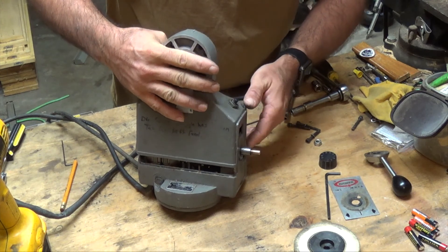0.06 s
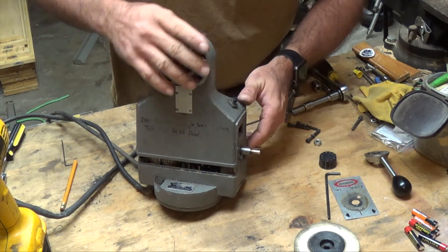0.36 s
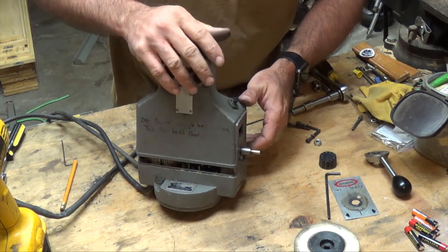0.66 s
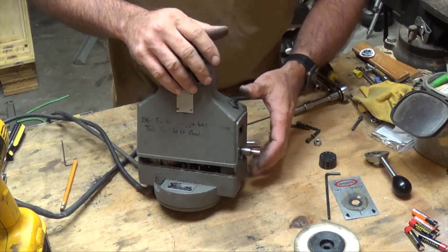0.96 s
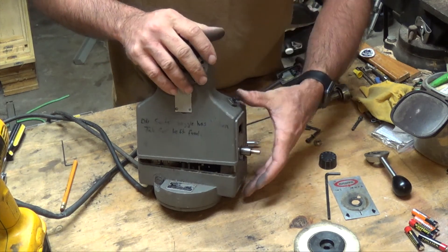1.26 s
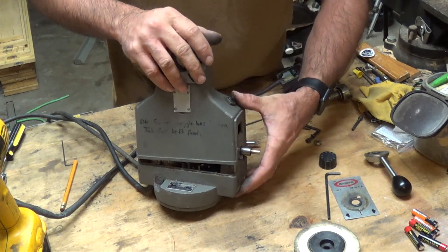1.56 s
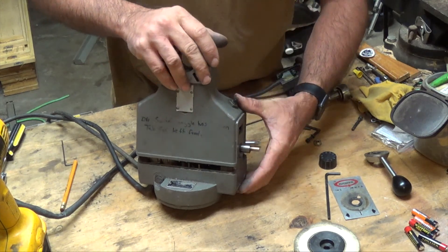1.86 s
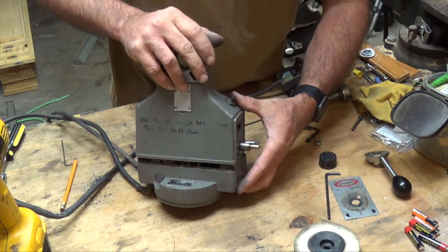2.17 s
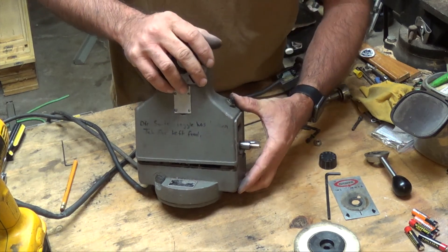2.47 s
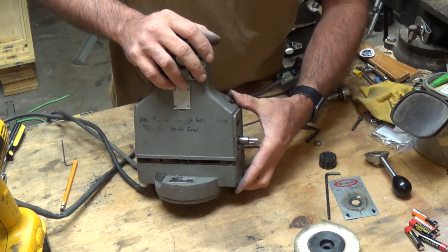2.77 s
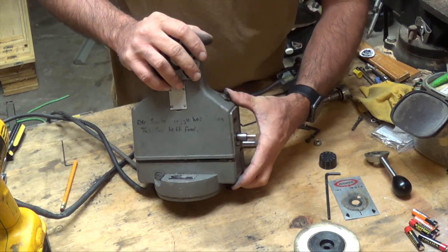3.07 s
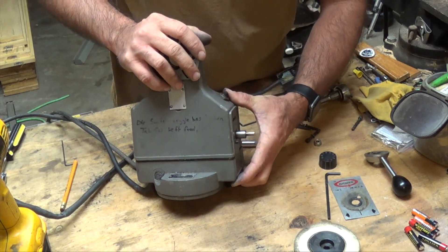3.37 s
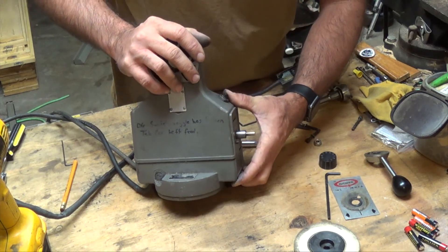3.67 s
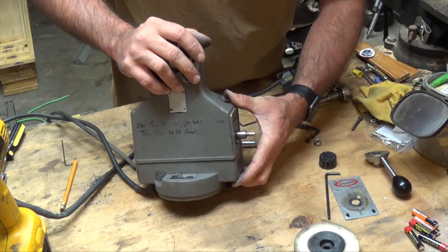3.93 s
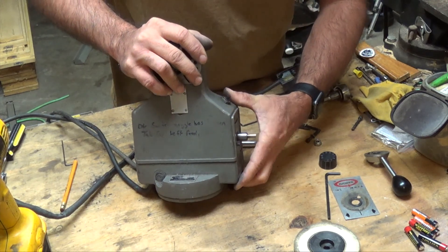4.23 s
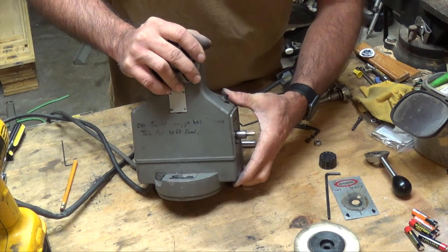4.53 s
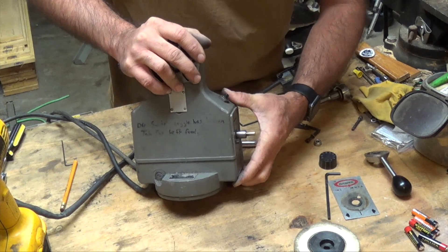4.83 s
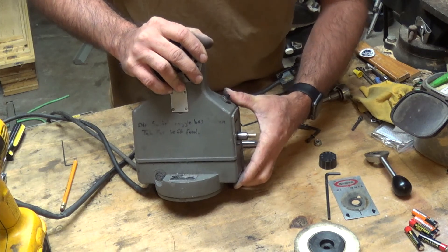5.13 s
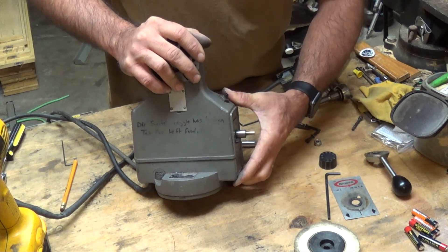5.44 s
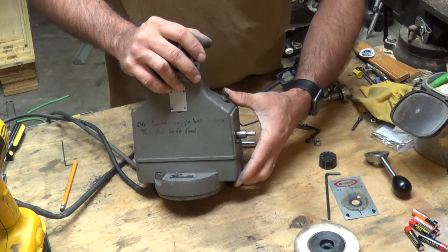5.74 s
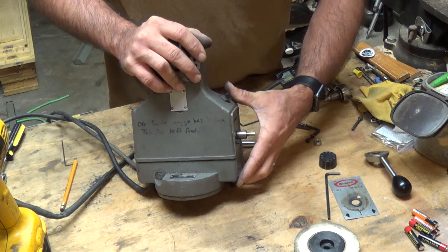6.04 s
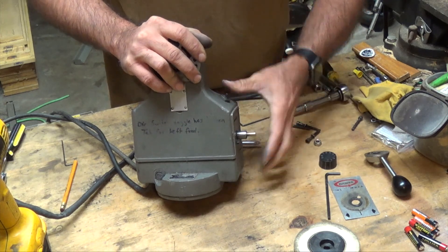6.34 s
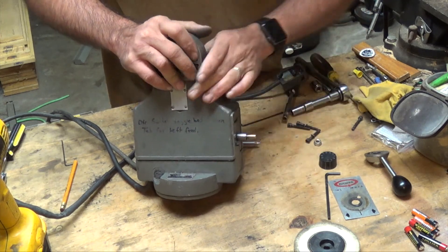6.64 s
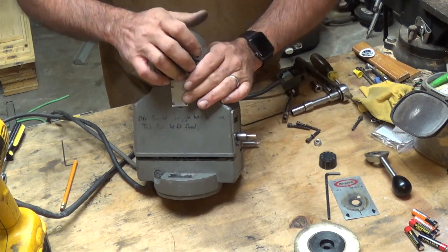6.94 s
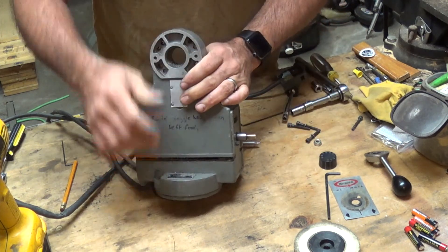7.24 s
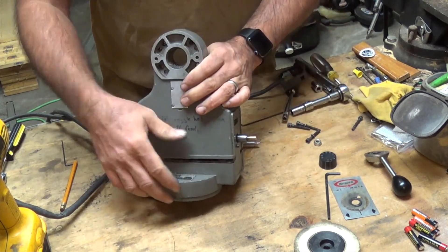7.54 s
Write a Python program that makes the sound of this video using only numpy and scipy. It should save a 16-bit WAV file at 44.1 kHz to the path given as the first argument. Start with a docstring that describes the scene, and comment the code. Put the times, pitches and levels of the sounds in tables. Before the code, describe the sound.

A faint hiss, electrical hum and thin ticking whine run throughout in a small workshop, with everything heard up close. A hand brushes lightly over painted metal at the start. At about 1 second, a loose cast metal cover hits a machine housing in a quick cluster of bright, ringing clanks. Lighter taps, a tick and soft bumps follow until about 2.3 seconds. At 2.9 seconds the cover clinks and its rim slides down with a brief, thin rasp, seating with a loud, sharp knock near 3.5 seconds. The housing then rocks on the wooden bench with soft, low thumps, and a firmer double knock lands at 5.3 seconds. Another soft thump comes near 5.9 seconds. Skin rubs faintly around 6.6 seconds, leading into a loud clank and knock at 6.9 seconds and one small, dull knock just after.

```python
"""Fitting a metal cover

A cast metal cover is worked down onto a machine housing that stands on a wooden workbench.
Loose, the cover clanks and rings; pressed home, it knocks dully and rocks the housing on the bench.
In between, hands rub the paint, the cover's rim slides and sharp edges catch with a tick.
A faint hiss and hum fill the small workshop, and a camera nearby ticks and whines."""
import sys
import numpy as np
from scipy import signal
from scipy.fft import rfft, irfft, next_fast_len
from scipy.io import wavfile
from scipy.ndimage import map_coordinates

SR = 44100
rng = np.random.default_rng(int(sys.argv[2]) if len(sys.argv) > 2 else 0)


def int16_out(signal):
    """Quantize to a 16-bit WAV file."""
    q = np.round(np.clip(np.atleast_2d(signal).T, -1, 1) * 32767)
    wavfile.write(sys.argv[1], SR, q.astype(np.int16))


N = 335160

# The workshop's echo. Each row: frequency in Hz, fade time in seconds (the time to drop by 60 dB).
ROOM_FADE = [(100, 0.23), (250, 0.32), (1000, 0.28), (4000, 0.28), (8000, 0.24), (15000, 0.064)]
# The tone of the background hiss. Each row: frequency in Hz, strength in dB.
HISS_TONE = [(15, -42), (25, -3.5), (113, -0.5), (136, 0), (215, -1), (240, -3), (331, -5), (359, -2.5),
             (389, -6), (482, -5.5), (523, -5), (2120, -10), (3630, -13.5), (13500, -17), (15500, -17.5)]
# How wide the hiss sounds. Each row: frequency in Hz, the ears' opposite part over their shared part in dB.
HISS_WIDTH = [(60, -50), (150, -19), (380, -4), (950, -1.5), (2380, -2.5), (5980, -8), (15000, -93)]
# The level of the background hiss, which dips after the first loud clanks and slowly recovers.
# Each row: time in seconds, level in dB.
HISS_LEVEL = [(0.0, -51), (1.2, -50), (1.33, -53), (3.26, -49.5), (6.54, -49), (6.88, -46), (7.6, -49.5)]
# Mains hum and thin electrical whines. Each row: pitch in Hz, level in dB.
HUM_NOTES = [(120, -68), (240, -67.5), (360, -64.5), (480, -68), (1920, -72), (2040, -71), (2159, -71),
             (2520, -75.5), (7881, -73)]
# A hand slides over the paint. Each row: start in seconds, length in seconds, level in dB.
HAND_RUBS = [(0.116, 0.088, -59), (0.24, 0.027, -49.5), (6.56, 0.32, -55.5)]
# The tone of rubbing skin. Each row: frequency in Hz, strength in dB.
SKIN_TONE = [(500, -33), (3000, -14), (5000, -7), (11000, -0.5), (15000, -19)]
# Sharp edges catch. Each row: start in seconds, level in dB, frequency in Hz below which the tick thins.
EDGE_TICKS = [(.9465, -43, 2800), (1.846, -36, 6000), (3.438, -26, 8000), (5.3612, -33.5, 6000)]
# The tone of a hard edge's click. Each row: frequency in Hz, strength in dB.
CLICK_TONE = [(300, -30), (2000, 12), (5000, 7), (8000, 1), (12000, -2.5), (15500, -31)]
# The notes of the loose cover. Each row: pitch in Hz, level in dB when struck on the side,
# on the rim and on a corner, fade time in seconds.
COVER_NOTES = [(809, -17, -16, -18, .2), (879, -2, 0, -4, .24), (1340, -11, -26, -24, .22),
               (1729, -7, -5, -8, .26), (1841, -22, -24, -15, .2), (1934, -19, -17, -14, .2),
               (2567, -16, -6, -10, .18), (2804, -15, -20, -8, .14), (3235, -30, -14, -18, .11),
               (3330, -27, -17, -10, .14), (3531, -24, -13, -11, .11), (3711, -14, -22, -1, .11),
               (4420, -25, -40, -34, .08), (5600, -30, -28, -10, .17), (5770, -26, -28, -14, .14),
               (5990, -17, -25, -18, .12), (6708, -27, -25, -19, .13), (7768, -22, -19, -22, .11),
               (9787, -24, -11, -15, .1), (11090, -24, -22, -7, .1)]
# The notes of the housing with the cover on it. Each row: pitch in Hz, level in dB, fade time in seconds.
HOUSING_NOTES = [(375, -1, 0.1), (420, 4.5, 0.072), (498, 6, 0.056), (601.4, 1.5, 0.092), (783, -1, 0.057),
                 (902, -1.5, 0.051), (988.4, -2, 0.062), (1227, -10, 0.071), (1325, 2, 0.062),
                 (1468, -13.5, 0.24), (1958, -7, 0.047), (1984, -4, 0.091), (2176, -3.5, 0.06),
                 (2370, -35, 0.035), (2824, -12, 0.2), (3685, 5, 0.033), (3870, -10, .14)]
# The casting's crowded notes blur into a clatter. Each row: frequency in Hz, strength in dB.
CLATTER_TONE = [(30, -48), (100, 8.5), (350, -4), (1000, -0.5), (2000, -0.5), (4400, -2.5), (5500, -27),
                (9000, -41), (16000, -22)]
# The notes of the wooden bench top. Each row: pitch in Hz, level in dB, fade time in seconds.
BENCH_NOTES = [(75, -20.5, 0.066), (133.4, -6.5, 0.061), (230, -6, 0.13), (239.2, -5.5, 0.084),
               (350, -8.5, 0.049)]
# The loose cover hits the housing. Each row: start in seconds, cover ring in dB, housing knock in dB,
# bench thump in dB, hardness in Hz (higher is brighter), seconds the cover stays free,
# place struck (-1 side, 0 rim, 1 corner).
LOOSE_CLANKS = [(0.9935, -5.5, -23, -48, 5250, 0.021, 0.095), (1.018, -13, -25.5, -26, 5800, 0.017, 1),
                (1.0473, -11.5, -27, -31, 1150, 0.0085, -0.56), (1.255, -31, -38, -42, 2360, 0.044, -1.1),
                (1.502, -33.5, -40.5, -41, 3330, 0.029, -1.05),
                (1.9081, -27.5, -35.5, -35, 2400, 0.0071, 0.58),
                (2.9195, -17.5, -25.5, -30, 1170, 0.0035, -0.45),
                (3.4291, -16, -18.5, -17, 1790, 0.016, -0.087), (6.8227, -38, -35, -50, 1100, .012, -.8),
                (6.8498, -10, -26.5, -16, 5130, 0.025, -0.95),
                (6.8767, -13.5, -17.5, -13, 3380, 0.0075, -1.1)]
# The pressed cover hits the housing. Each row: start in seconds, housing knock in dB, bench thump in dB,
# hardness in Hz, pitch in Hz of the hollow sound near the blow.
PRESSED_KNOCKS = [(1.0341, -33, -26, 1200, 600), (1.538, -42.5, -40, 900, 447),
                  (2.26, -51, -36, 1700, 1630), (3.118, -32, -31.5, 1500, 790),
                  (3.454, -13.5, -12.5, 2200, 970), (3.4569, -18, -45, 3270, 3870),
                  (3.476, -22, -26, 1300, 357), (5.2684, -26.5, -21.5, 2100, 1410),
                  (5.312, -23.5, -10.5, 3300, 2160), (6.8869, -16, -15.5, 3060, 960),
                  (6.92, -28, -27, 1190, 585), (7.0376, -27, -34.5, 680, 730)]
# Soft low thumps through the bench: mostly the housing rocking, but at 1.834 s the sliding rim starts to
# shudder. Each row: start in seconds, thump in dB, push length in seconds.
HOUSING_ROCKS = [(1.599, -38.5, .003), (1.834, -32, .006), (2.293, -38, 0.0017), (3.214, -33, .003),
                 (3.335, -37.5, .006), (3.752, -30.5, 0.015), (4.443, -32, 0.0065), (4.476, -35, 0.0017),
                 (4.678, -28, 0.0098), (4.898, -29, 0.018), (4.999, -26, 0.0089), (5.121, -30.5, 0.00081),
                 (5.153, -35, .0055), (5.922, -27, 0.01)]
# The rim slides down the housing. Each row: start in seconds, length in seconds, hiss in dB, shudder in dB.
RIM_SLIDES = [(1.841, 0.011, -46, -38.5), (2.885, 0.38, -50, -54)]
# The tone of the sliding rim. Each row: frequency in Hz, strength in dB.
SLIDE_TONE = [(2000, -15), (7500, -8.5), (9800, -5), (11200, -1), (12800, -9), (15500, -10)]
# The rim's narrow, high notes, which make its hiss rasp. Each entry: pitch in Hz.
RIM_NOTES = [9750, 10700, 11300, 11750, 12700]
# The balance between the ears. Each row: frequency in Hz, left minus right in dB.
EAR_BALANCE = [(30, -1.3), (150, -2.2), (600, -1.1), (1300, .8), (2500, 0)]

TIME = np.arange(N) / SR  # seconds through the whole scene
BLOW_TIME = np.arange(SR // 2) / SR  # seconds through one blow


def amp(db):
    """Turns decibels into a number to multiply by."""
    return 10 ** (np.asarray(db) / 20)


def unit(x):
    """Scales a sound to an average (rms) level of 1."""
    return x / np.sqrt(np.mean(x ** 2) + 1e-20)


def along(points, hz):
    """Reads between the rows of a frequency table, spacing octaves evenly."""
    freqs, values = np.transpose(points)
    return np.interp(np.log(hz + 1), np.log(freqs + 1), values)


def wobble(rate):
    """A smooth curve through `rate` random values a second."""
    values = rng.standard_normal(int(N * rate / SR) + 4)
    return map_coordinates(values, [TIME * rate])


def filtered(x, response):
    """Multiplies each frequency in a sound by response(hz)."""
    length = x.shape[-1]
    padded = next_fast_len(length + 8192)
    hz = np.fft.rfftfreq(padded, 1 / SR)
    return irfft(rfft(x, padded) * response(hz), padded)[..., :length]


def noise(tone, size):
    """Noise shaped by a tone table, at an average level of 1."""
    return unit(filtered(rng.standard_normal(size), lambda hz: amp(along(tone, hz))))


def fade(t, fade_s):
    """Dies away, dropping 60 dB every fade_s seconds."""
    return np.exp(-np.log(1000) * t / fade_s)


def stroke(start_s, length_s, attack_s, release_s, sag_db_per_s=0):
    """A loudness curve that swells up to its start, holds or sags for its length, then dies away."""
    t = TIME - start_s
    edges = np.exp(np.minimum(t, 0) / attack_s - np.maximum(t - length_s, 0) / release_s)
    return edges * amp(-sag_db_per_s * np.clip(t, 0, length_s))


def ring(notes, scatter_db):
    """Struck metal rings with fading notes, at slightly new strengths for each blow."""
    hz, db, fade_s = np.transpose(notes)[:, :, None]
    gain = amp(db + scatter_db * rng.standard_normal(hz.shape)) * rng.choice([-1, 1], hz.shape)
    return np.sum(gain * np.sin(2 * np.pi * hz * BLOW_TIME) * fade(BLOW_TIME, fade_s), axis=0)


def soften(x, hz):
    """Turns down the treble above hz, as a softer, longer contact does."""
    return signal.lfilter(*signal.butter(2, hz, fs=SR), x)


def thin(x, hz=85):
    """Turns down everything below hz: small objects give off almost no deep bass."""
    return signal.lfilter(*signal.butter(2, hz, "high", fs=SR), x)


def add(track, start_s, sound):
    """Mixes a sound into a left and right track at the given time."""
    part = track[:, round(start_s * SR):][:, :sound.shape[1]]
    part += sound[:, :part.shape[1]]


def in_room(x, echo_db):
    """Puts a sound in the middle and adds the workshop's short echo, giving left and right."""
    hz, t, spectrum = signal.stft(rng.standard_normal((2, SR // 2)), SR, nperseg=256)
    tail = signal.istft(spectrum * fade(t, along(ROOM_FADE, hz)[:, None]), SR, nperseg=256)[1]
    echo = amp(echo_db) * tail / np.linalg.norm(tail[0])
    late = np.pad(x, (round(.004 * SR), 0))  # the echo starts 4 ms later
    middle, side = signal.fftconvolve(late[None], echo, axes=1)[:, :len(x)]
    side = amp(-5) * soften(side, hz=4500)
    return np.array([x + middle + side, x + middle - side])


def hiss_and_hum():
    """A background hiss dips and recovers, the mains hum, and a low drone swells once near the end."""
    hiss = noise(HISS_TONE, N) * amp(0.099 * wobble(4.6))
    side = filtered(noise(HISS_TONE, N), lambda hz: amp(along(HISS_WIDTH, hz)))
    hiss_db = np.interp(TIME, *np.transpose(HISS_LEVEL))
    hum = sum(amp(db) * np.sqrt(2) * np.sin(2 * np.pi * hz * TIME + 0.076 * wobble(4.02))
              for hz, db in HUM_NOTES)
    swell = stroke(start_s=6.32, length_s=.4, attack_s=0.29, release_s=0.63)
    drone = amp(-55.5) * swell * np.sqrt(2) * np.sin(2 * np.pi * 80 * TIME + wobble(21))
    return amp(hiss_db) * np.array([hiss + side, hiss - side]) + hum + drone


def camera(frame_hz=29.97):
    """The camera's mechanism ticks faintly once a frame, and its high whine flutters twice a frame."""
    since_frame = (TIME + 0.016) % (1 / frame_hz)
    swell = np.exp(-((since_frame - .008) / 0.0035) ** 2)
    ticks = amp(-54.5 + wobble(28)) * swell * np.sin(2 * np.pi * 3270 * since_frame)
    flutter = 1 + 0.26 * np.sin(2 * np.pi * 2 * frame_hz * TIME)
    whine = amp(-57) * flutter * np.sin(2 * np.pi * 525 * frame_hz * TIME)
    return ticks + whine


def hand_rubbing():
    """Skin hisses unevenly as it slides over the paint."""
    level = sum(amp(db) * stroke(start_s, length_s, attack_s=0.017, release_s=0.026)
                for start_s, length_s, db in HAND_RUBS)
    skin = level * amp(1.8 * wobble(70)) * noise(SKIN_TONE, N)
    return in_room(skin, echo_db=-13)


def edge_click():
    """A hard edge makes a short, bright burst of noise."""
    level = fade(BLOW_TIME, 0.034) + amp(-4) * fade(BLOW_TIME, 0.022)
    return noise(CLICK_TONE, len(BLOW_TIME)) * level


def edge_ticking():
    """An edge catches and lets go without moving the housing; the finer the edge, the thinner its tick."""
    out = np.zeros((2, N))
    for start_s, db, low_hz in EDGE_TICKS:
        tick = amp(db) * thin(edge_click(), low_hz)
        add(out, start_s, in_room(tick, echo_db=-7))
    return out


def cover_ring(free_s, place):
    """The place of the blow sets how strong each note is; the ring is choked when the cover lands again."""
    notes = [(hz, np.interp(place, [-1, 0, 1], [side, rim, corner]), fade_s)
             for hz, side, rim, corner, fade_s in COVER_NOTES]
    rise = 1 - np.exp(-BLOW_TIME / .0012)
    choke = fade(np.maximum(BLOW_TIME - free_s, 0), 0.014)
    return ring(notes, scatter_db=1) * rise * choke


def housing_knock(hollow_hz):
    """Short notes sound under a sharp crack and a clatter; the metal near the blow adds a hollow tone."""
    body = amp(-8.5) * ring(HOUSING_NOTES, scatter_db=1.5)
    crack_and_clatter = amp(2) * fade(BLOW_TIME, 0.015) + amp(-4.5) * fade(BLOW_TIME, 0.089)
    knock = body + noise(CLATTER_TONE, len(BLOW_TIME)) * crack_and_clatter
    hollow = signal.lfilter(*signal.iirpeak(hollow_hz, Q=3.5, fs=SR), knock)
    return knock + amp(7) * hollow


def bench_thump(push_s):
    """The bench top's low notes, all pushed the same way, swell over the length of the push."""
    wood = sum(amp(db) * np.sin(2 * np.pi * hz * BLOW_TIME) * fade(BLOW_TIME, fade_s)
               for hz, db, fade_s in BENCH_NOTES)
    return wood * (1 - np.exp(-(BLOW_TIME / push_s) ** 2))


def blow(ring_db, knock_db, thump_db, hard_hz, free_s, place, hollow_hz):
    """One blow rings the cover, knocks the housing, thumps the bench and clicks at the edge."""
    metal = amp(ring_db) * cover_ring(free_s, place) + amp(knock_db) * housing_knock(hollow_hz)
    bench = amp(thump_db) * bench_thump(push_s=0.0018)
    click_db = knock_db - 10.5 + 17 * np.log2(hard_hz / 3000)  # harder blows click more
    click = amp(click_db) * edge_click()
    return in_room(thin(soften(metal, hard_hz) + bench + click), echo_db=-10)


def loose_clanking():
    """The loose cover strikes the housing and rings freely until it lands again."""
    out = np.zeros((2, N))
    for start_s, *settings in LOOSE_CLANKS:
        add(out, start_s, blow(*settings, hollow_hz=710))
    return out


def pressed_knocking(tips_above_db=-17, bounce_loss_db=11):
    """The held cover knocks dully; a heavy knock tips the housing, which settles in two weaker bounces."""
    out = np.zeros((2, N))
    for start_s, knock_db, thump_db, hard_hz, hollow_hz in PRESSED_KNOCKS:
        bounces = 2 if knock_db > tips_above_db else 0
        for k in range(1 + bounces):
            ring_db = knock_db - 16  # a held cover rings little
            sound = blow(ring_db, knock_db, thump_db, hard_hz, free_s=.005, place=.2, hollow_hz=hollow_hz)
            add(out, start_s, sound)
            start_s += .02 * .85 ** k  # each hop is shorter than the last
            knock_db -= bounce_loss_db
            thump_db -= bounce_loss_db
            hard_hz, hollow_hz = 1800, 1990  # the tone of the housing falling back
    return out


def housing_rocking():
    """Soft low thumps through the bench, mostly from hand pressure tipping the housing, once as the rim starts
    to shudder."""
    out = np.zeros((2, N))
    for start_s, db, push_s in HOUSING_ROCKS:
        thump = thin(amp(db) * bench_thump(push_s))
        add(out, start_s, in_room(thump, echo_db=-17.5))
    return out


def rim_rasp(width_hz=110):
    """The rim's narrow, high notes colour the noise of rubbing metal."""
    def boost(hz):
        peaks = sum(1 / (1 + ((hz - note_hz) / width_hz) ** 2) for note_hz in RIM_NOTES)
        return 1 + amp(-3) * peaks
    return unit(filtered(noise(SLIDE_TONE, N), boost))


def rim_sliding():
    """The sliding rim hisses, and its tiny slips make the cover shudder; both fade as the cover slows."""
    slides = np.array([stroke(start_s, length_s, attack_s=0.013, release_s=0.03, sag_db_per_s=8)
                       for start_s, length_s, _, _ in RIM_SLIDES])
    _, _, hiss_db, shudder_db = np.transpose(RIM_SLIDES)
    hiss = amp(hiss_db) @ slides * amp(1.1 * wobble(120)) * rim_rasp()
    gripped_metal = cover_ring(free_s=0, place=0.31) + amp(-20) * housing_knock(hollow_hz=905)
    slips = rng.standard_normal(N) ** 3  # many small slips and a few big ones
    shaking = signal.fftconvolve(slips, soften(gripped_metal, hz=3140))[:N]
    shudder = amp(shudder_db) @ slides * unit(shaking)
    return in_room(hiss + shudder, echo_db=-13)


def scene():
    """All the sounds together, heard from close by."""
    return (hiss_and_hum() + camera() + hand_rubbing() + edge_ticking()
            + loose_clanking() + pressed_knocking() + housing_rocking() + rim_sliding())


def record(dry):
    """Gives the right side a little more bass, rounds off loud peaks and cuts the highest treble."""
    balanced = filtered(dry, lambda hz: amp(np.outer([.5, -.5], along(EAR_BALANCE, hz))))
    rounded = balanced / (1 + np.abs(balanced) ** 8) ** (1 / 8)
    return filtered(rounded, lambda hz: hz < 15850)


dry = scene()
out = record(dry)
int16_out(out)
```